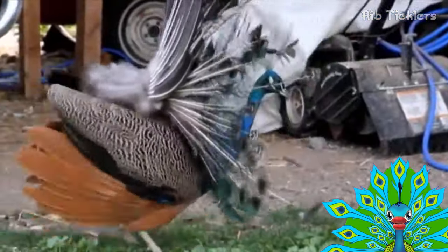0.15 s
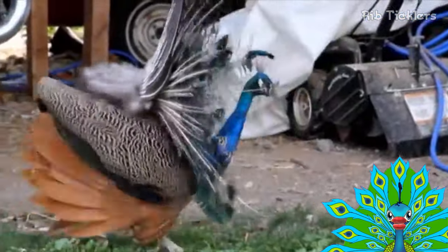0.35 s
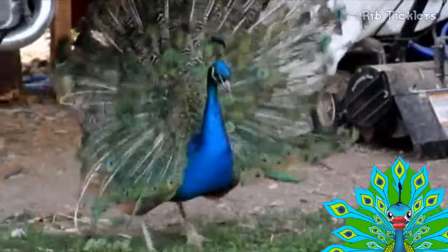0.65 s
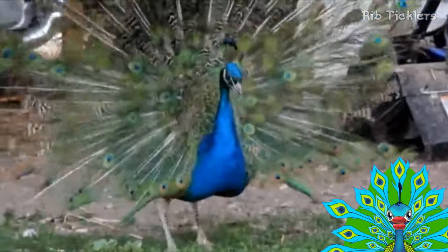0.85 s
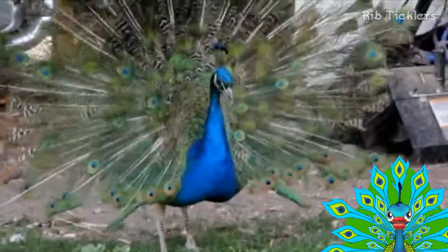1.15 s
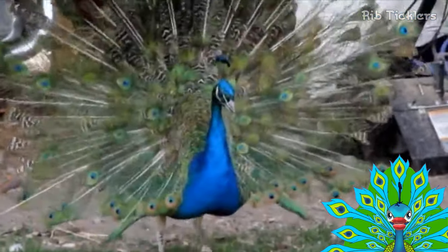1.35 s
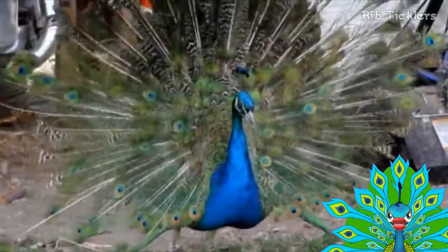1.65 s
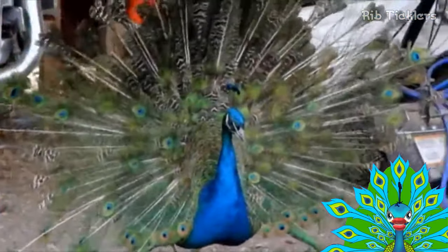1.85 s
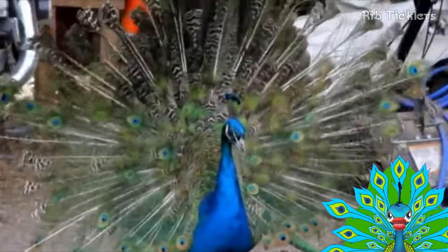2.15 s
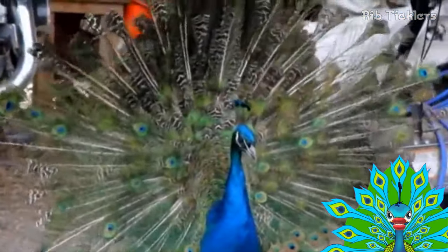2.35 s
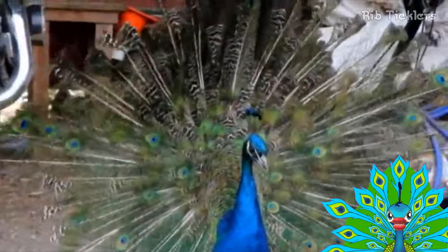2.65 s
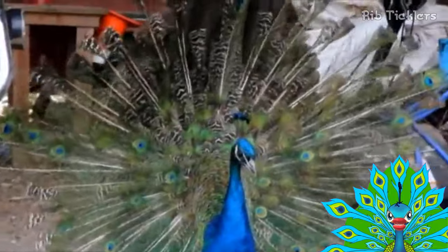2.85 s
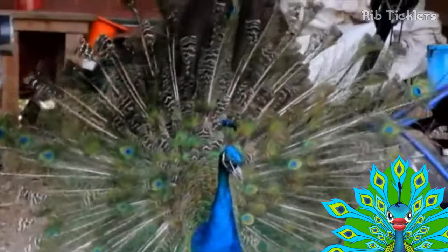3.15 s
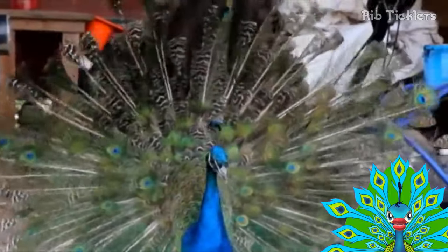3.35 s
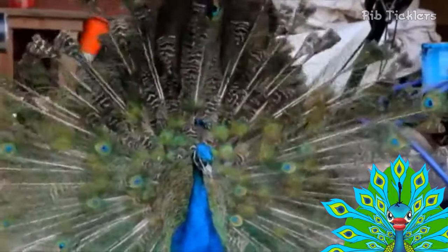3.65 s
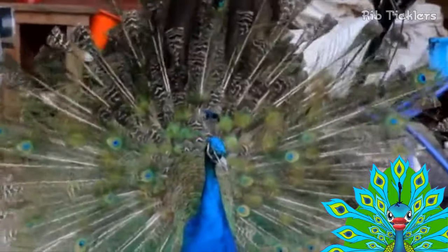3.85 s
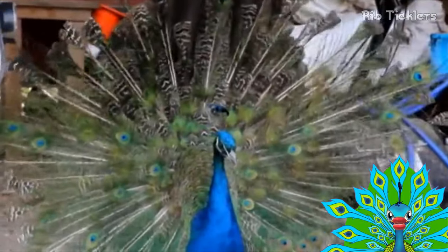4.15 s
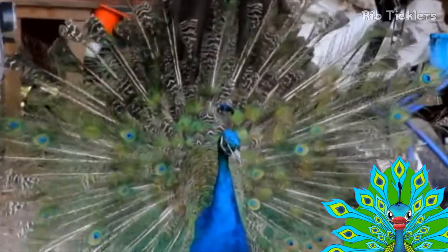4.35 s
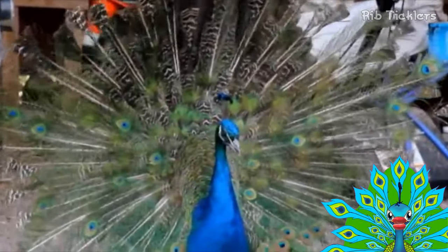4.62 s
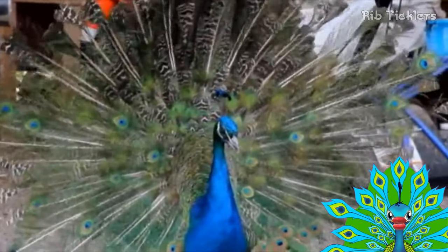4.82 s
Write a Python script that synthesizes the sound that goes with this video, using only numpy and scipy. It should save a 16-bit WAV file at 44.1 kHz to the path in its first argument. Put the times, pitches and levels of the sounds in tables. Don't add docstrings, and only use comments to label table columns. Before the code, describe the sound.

From 0 to 0.8 s a large bird turns on dry ground close by: short gritty scrapes of wing and claw, sharp dry snaps, the hardest near 0.26 s, and soft hollow footfalls clustering around 0.3 and 0.6 to 0.8 s. Then its fanned tail begins to shiver, a dry rattling hiss of countless quills ticking, fluttering about 26 strokes a second. It holds fairly steady, eases near 2.3 s, swells around 2.65 s, and shakes harder near 3.1, 3.3 and 3.6 s, with isolated snaps at 1.5, 2.7 and 3.65 s. It sinks almost away by 4.2 s, where a far low motor hum rises; a tiny chirp at 4.2 s and a faint rising call at 4.7 s follow. Small jolts rebuild to a strong shake at the end. All this is left only; the right has low circuit hiss and soft electrical blips in the first 0.65 s. Treble is dull and patchy.

```python
import sys
import numpy as np
from scipy import signal
from scipy.fft import rfft, irfft
from scipy.io import wavfile
from scipy.ndimage import uniform_filter1d

SR = 44100
rng = np.random.default_rng(int(sys.argv[2]) if len(sys.argv) > 2 else 0)


def wrap_up_sound(samples):
    columns = np.atleast_2d(samples).T
    tamed = np.clip(columns, -1, 1)
    steps = np.round(tamed * 32767).astype(np.int16)
    wavfile.write(sys.argv[1], SR, steps)


def volts_from_decibels(level):
    exponent = np.asarray(level, float) / 20
    return 10 ** exponent


N = 219822
T = np.arange(N) / SR


def unit(x):
    return x / np.sqrt(np.mean(x ** 2))


def curve(rows, column=1):
    rows = np.array(rows)
    return np.interp(T, rows[:, 0], rows[:, column])


def colour(x, shape):
    below = (shape[0][0] / 2, shape[0][1] - 40)
    above = (shape[-1][0] * 2, shape[-1][1] - 40)
    hz, db = np.transpose([below] + list(shape) + [above])
    size = 4096
    bins_hz = np.arange(size // 2 + 1) * SR / size
    log_gain = np.interp(np.log(bins_hz + 1), np.log(hz), db) * np.log(10) / 20
    cepstrum = irfft(log_gain)
    cepstrum[1:size // 2] *= 2
    cepstrum[size // 2 + 1:] = 0
    return signal.fftconvolve(x, irfft(np.exp(rfft(cepstrum))))[:N]


def walk(rate):
    hold = int(SR / rate)
    steps = np.repeat(rng.standard_normal(N // hold + 1), hold)
    return 1.215 * uniform_filter1d(uniform_filter1d(steps, hold), hold)[:N]


def wobbling_sine(pitch_hz):
    return np.sin(2 * np.pi * np.cumsum(pitch_hz) / SR)


def ticks(rate, spread_db, cap_db):
    hit = rng.random(N) < rate / SR
    size_db = np.minimum(spread_db * rng.exponential(size=N), cap_db)
    return unit(hit * rng.standard_normal(N) * volts_from_decibels(size_db))


def rustle(level_db, shape, rate, share, flicker_db, clash):
    contact = share * clash + ticks(rate, spread_db=0.0, cap_db=12)
    return unit(colour(contact, shape)) * volts_from_decibels(level_db + flicker_db * walk(29.78) + 6.5)


# pitch_hz, level_db (per Hz)
GRIT_COLOUR = [(3500, -12), (4500, -3.5), (6200, 0), (8500, 1), (10000, -8), (11000, -44)]
WING_COLOUR = [(600, -3.5), (900, -2.5), (2000, -3), (2600, -12.5)]
SCRAPE_COLOUR = [(2300, 4), (2800, 4.5), (3600, 3.5), (4200, 0)]
BODY_COLOUR = [(40, -20), (110, -3), (230, -2.5), (420, -3.5), (650, -7.5), (850, -12)]
# start_s (peak), level_db, grit_db, weight_db, fall_s (to drop 20 dB)
DRAGS = [(.004, -38.5, 0.5, -1, 0.07), (.11, -47.5, -2, -11, 0.2), (.163, -46, 5, -2, 0.02),
         (.176, -40.5, 2.5, 0, 0.09), (0.268, -44, -10, 6, 0.09), (.3, -43.5, -16, 1, 0.02),
         (.468, -46, -2, 6.5, 0.01), (0.506, -46.5, -2, 3, .08), (0.52, -44.5, -2.5, 1.5, .1),
         (0.608, -42, 0, 2, 0.03), (.66, -44.5, 1, 0, 0.08), (.702, -45, -4, 4.5, 0.44),
         (.732, -44, -5, 6, 0), (.748, -44.5, 1, 3.5, 0.03), (.786, -48, -6, 6, 0.2),
         (.818, -46.5, 4, -2.5, 0.47)]


def turning_drags():
    shuffle_db = np.array([-63, -57.5, -65, -54.5])
    rise_share = 0.32
    power = np.outer(volts_from_decibels(2 * shuffle_db), np.ones(N))
    for start_s, db, grit_db, weight_db, fall_s in DRAGS:
        away = np.maximum((T - start_s) / fall_s, (start_s - T) / (rise_share * fall_s))
        drag_db = db - 20 * away
        scrape_db = -3 + 0.15 * grit_db
        mix_db = np.array([grit_db, 0, scrape_db, weight_db])
        power = power + volts_from_decibels(2 * (mix_db[:, None] + drag_db))
    grit, wing, scrape, body = 10 * np.log10(power) + 0.5 * walk(61.4)
    clash = ticks(500, spread_db=-2.0, cap_db=8.5)
    out = rustle(grit, GRIT_COLOUR, 7000, .35, .8, clash)
    out += rustle(wing, WING_COLOUR, 4000, .5, .8, clash)
    out += rustle(scrape, SCRAPE_COLOUR, 5000, .5, .8, clash)
    out += rustle(body, BODY_COLOUR, 1500, .3, 1.2, clash)
    return out * np.clip((.86 - T) / .06, 0, 1)


# start_s, level_db (peak), brightness_db, contact_ms
SNAPS = [(0.0074, -19, -17, 0.076), (0.1743, -14.5, -8.5, 0.25), (0.2641, -6, -28, 0.094),
         (0.267, -19, -30, 0.11), (0.306, -21, -22, 0.12), (0.5191, -29, -14, 0.2), (0.606, -27, -10, 0.11),
         (0.6594, -22.5, -1.5, 0.05), (0.7366, -23, -21, 0.3), (0.7797, -13, -26, 0.14),
         (0.7905, -18.5, -21, 0.32), (1.4738, -18, -8, 0.11), (2.672, -18, -16, 0.17),
         (2.748, -25, 0, 0.091), (2.8254, -36, -8, 0.15), (3.6367, -14.5, -6, 0.058),
         (3.6735, -12, -11, 0.048), (3.7145, -26, 2, 0.093), (3.7376, -20, -14, 0.082)]


def snaps():
    t = np.arange(400) / SR - .0014
    rattle_band = signal.butter(4, (3800, 8800), "bandpass", fs=SR, output="sos")
    out = np.zeros(N + len(t))
    for start_s, db, bright_db, contact_ms in SNAPS:
        beat = 1000 * t / contact_ms
        push = -np.exp(-beat ** 2)
        rebound = 0.23 * np.exp(-(beat / 2 - 1.6) ** 2)
        burst = signal.sosfilt(rattle_band, rng.standard_normal(len(t)))
        burst = burst * (t > 0) * np.exp(-t / 0.0014)
        i = int(start_s * SR)
        out[i:i + len(t)] += volts_from_decibels(db + 1.0) * (push + rebound + volts_from_decibels(bright_db + 6.0) * burst)
    return out[:N]


# start_s, level_db (peak), pitch_hz, t60_s
FEET = [
    (0.267, -23.5, 173, 0.087),
    (.304, -22.5, 261, 0.1),
    (.506, -28, 156, 0.11),
    (.606, -25, 168, 0.065),
    (0.681, -21.5, 109, 0.067),
    (0.701, -30, 420, .08),
    (.734, -20, 420, 0.048),
    (.748, -27.5, 228, 0.26),
    (0.754, -30.5, 309, 0.31),
    (.79, -30.5, 209, 0.11),
]


def feet():
    out = 0
    for start_s, db, hz, t60_s in FEET:
        t = np.maximum(T - start_s, 0)
        envelope = (1 - np.exp(-t * hz)) * 1000 ** (-t / t60_s)
        out = out + volts_from_decibels(db) * envelope * np.sin(2 * np.pi * hz * t)
    return out


# pitch_hz, level_db (per Hz)
BARB_COLOUR = [(3300, -17), (4300, -5.5), (5200, -3.5), (6100, 0), (7200, -6), (8500, -12), (10500, -26.5)]
QUILL_COLOUR = [(300, -6), (450, -1.5), (1000, -2), (1600, -2), (2100, -4.5), (2700, -14)]
TIPS_COLOUR = [(1900, -7.5), (2400, 2), (2900, -3.5), (3600, -8.5), (4200, -9.5)]
FAN_COLOUR = [(35, -8), (70, -4), (150, -0.5), (250, -1), (380, -3.5)]
SIDE_BARB_COLOUR = [(3000, -7), (3500, 1), (4100, -1.5)]
# time_s, effort_db (as barb hiss)
EFFORT = [(.8, -40), (.93, -36.5), (1.32, -39.5), (1.8, -37.5), (2.02, -40), (2.34, -43), (2.64, -34.5),
          (2.88, -40), (3.2, -42), (3.45, -37.5), (3.75, -37), (3.79, -43.5), (3.93, -46), (4.0, -50.5),
          (4.21, -55.5), (4.49, -45.5), (4.6, -41.5), (4.9, -45)]
# time_s, extra_db, half_width_s
SURGES = [
    (1.04, 1, .03),
    (2.97, 1.5, 0.076),
    (3.11, 5.5, 0.064),
    (3.3, 5.5, 0.04),
    (3.62, 5, 0.06),
    (3.87, 2, 0.033),
    (4.26, 3.5, .02),
    (4.37, 2, 0.023),
    (4.57, 2.5, 0.056),
    (4.98, 6.5, 0.042),
]


def train():
    stroke_hz, full_effort_db = 26.3, -38
    phase = 2 * np.pi * np.cumsum(stroke_hz * (1 + .02 * walk(5))) / SR
    stroke_db = 0.51 * np.cos(phase) + 0.28 * np.cos(2 * phase + 3.3) + 0.13 * walk(26)
    surge_db = sum(db * np.exp(-((T - s) / half_s) ** 2) for s, db, half_s in SURGES)
    effort_db = curve(EFFORT) - full_effort_db + surge_db
    facing = np.exp(-((T - 1.38) / 0.76) ** 2)
    clash = ticks(900, spread_db=3.5, cap_db=5.5)
    barb_db = -38 + 0.98 * effort_db + stroke_db
    quill_db = -41.5 + 0.96 * effort_db + stroke_db
    tips_db = -53 + 0.97 * effort_db + stroke_db + 5 * facing
    fan_db = -50.5 + 0.9 * effort_db + stroke_db
    side_db = -53.5 + effort_db + stroke_db - 14 * facing
    out = rustle(barb_db, BARB_COLOUR, 9000, .35, .6, clash)
    out += rustle(quill_db, QUILL_COLOUR, 9000, .4, .6, clash)
    out += rustle(tips_db, TIPS_COLOUR, 9000, .4, .8, clash)
    out += rustle(fan_db, FAN_COLOUR, 9000, .3, 1.5, clash)
    out += rustle(side_db, SIDE_BARB_COLOUR, 9000, .4, .8, clash)
    return out * np.clip((T - .8) / .06, 0, 1)


def motor():
    far_db, near_db, on_s, rise_s = -64, -59, 4.12, 0.31
    rise = 1 - np.exp(-np.maximum(T - on_s, 0) / rise_s * 2)
    hum_db = far_db + (near_db - far_db) * rise
    return volts_from_decibels(hum_db + 2.0 * walk(13) + 9.5) * wobbling_sine(153.5 * (1 + 0.022 * walk(12)))


# start_s, length_s, pitch_hz, glide_hz_per_s, level_db
CALLS = [
    (4.2, .12, 1066, 10, -66),
    (4.71, .28, 752, 270, -55),
]


def far_calls():
    out = 0
    for start_s, length_s, hz, glide, db in CALLS:
        swell = np.clip(np.minimum(T - start_s, start_s + length_s - T) / .03, 0, 1)
        pitch_hz = (hz + glide * (T - start_s)) * (1 + 0.0102 * walk(40))
        out = out + swell * volts_from_decibels(db + 1.5 * walk(45) + 11) * wobbling_sine(pitch_hz)
    return out


def scene():
    left = turning_drags() + snaps() + feet() + train() + motor() + far_calls()
    return np.array([left, np.zeros(N)])


def blips():
    clock_s, clock_start_s, pitch_hz = .0501, -.0035, 248
    strong, faint = (3, 5, 6, 7, 8, 9, 10, 13), (1, 2, 96, 98, 99)
    out = 0
    for db, clock_ticks in ((-38, strong), (-47, faint)):
        for tick in clock_ticks:
            t = T - (clock_start_s + clock_s * tick)
            out = out + volts_from_decibels(db) * np.exp(-(t / 0.0038) ** 2) * np.sin(2 * np.pi * pitch_hz * t)
    return out


# pitch_hz, level_db (per Hz)
HISS_COLOUR = [(20, 14.5), (60, 12), (150, 2), (500, 5), (2000, 2), (8000, 1), (10600, -4.5), (12000, -27)]


def input_noise():
    left, right = (volts_from_decibels(db) * unit(colour(rng.standard_normal(N), HISS_COLOUR)) for db in (-45, -47.5))
    return np.array([left, right + blips()])


def low_rate(x):
    x = signal.sosfilt(signal.ellip(14, .3, 70, 10690, fs=SR, output="sos"), x)
    mirror = x * (-1) ** np.arange(N)
    mirror = signal.sosfilt(signal.butter(8, 12000, fs=SR, output="sos"), mirror)
    return x + volts_from_decibels(-5.0) * mirror


# pitch_hz, left_share (0-1), right_share (0-1)
KEPT = [(9900, 1, 1), (10200, .8, .98), (10600, .35, .85), (11400, .25, .5), (11900, .8, .85),
        (12400, .6, .4), (13000, .1, .06), (13200, 0, 0)]


def thin_top(x):
    hz, _, z = signal.stft(x, SR, nperseg=2048, noverlap=1024)
    chance = rng.random((2, len(hz) // 8 + 1, z.shape[2] // 2 + 1))
    chance = np.repeat(np.repeat(chance, 8, axis=1), 2, axis=2)[:, :len(hz), :z.shape[2]]
    rows = np.array(KEPT)
    patch_hz = hz // 172 * 172 + 86
    share = np.array([np.interp(patch_hz, rows[:, 0], rows[:, k]) for k in (1, 2)])
    return signal.istft(z * (chance < share[:, :, None]), SR, nperseg=2048, noverlap=1024)[1][:, :N]


def low_pass(x):
    return signal.sosfilt(signal.butter(12, 13150, fs=SR, output="sos"), x)


# time_s, gain_factor
GAIN = [
    (0, 1.43),
    (.17, 1.4),
    (.18, 1.27),
    (.264, 1.26),
    (.268, .81),
    (3.58, 1.16),
    (3.64, 1.09),
    (3.68, .85),
    (4.99, 1.03),
]


def record(dry):
    gain = curve(GAIN)
    x = low_rate(dry + gain * input_noise())
    offset = np.outer((.092, .0396), gain)
    return low_pass(thin_top(x) + offset)


dry = scene()
out = record(dry)
wrap_up_sound(out)
```